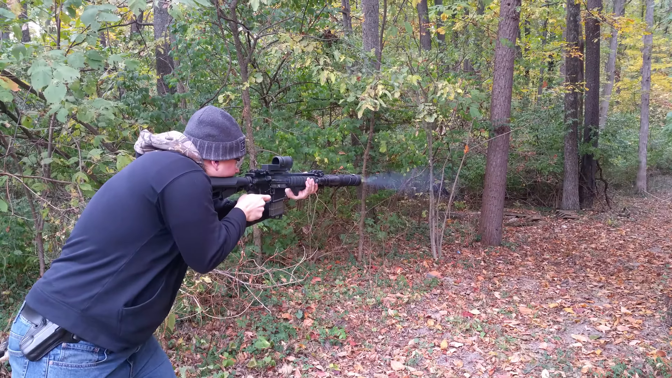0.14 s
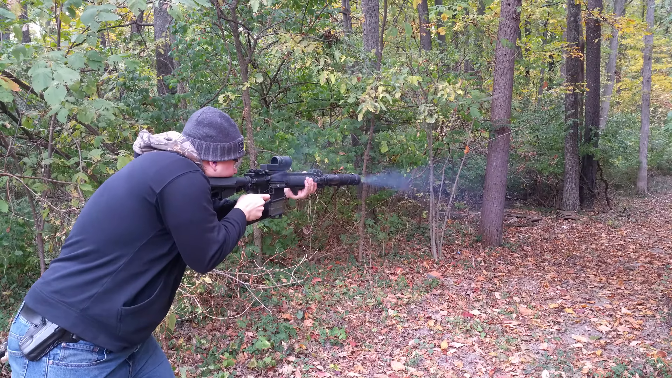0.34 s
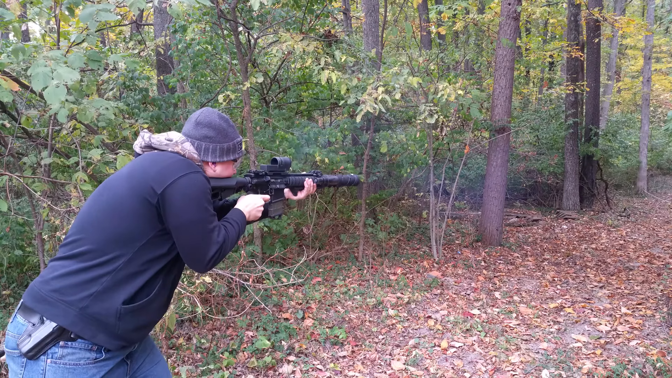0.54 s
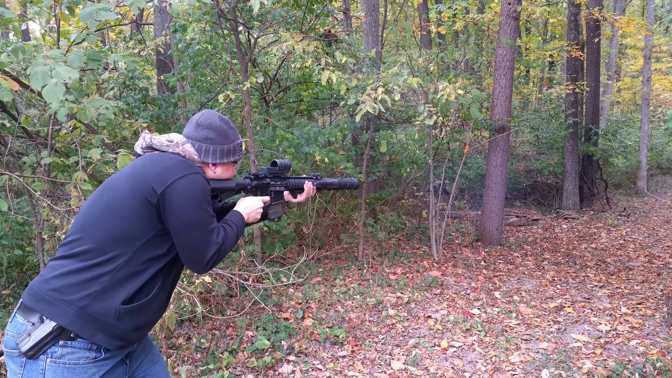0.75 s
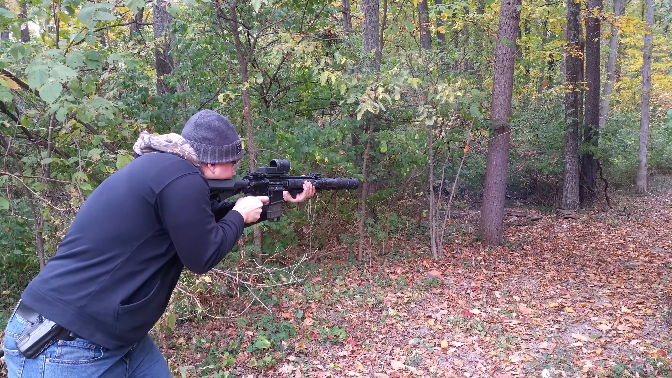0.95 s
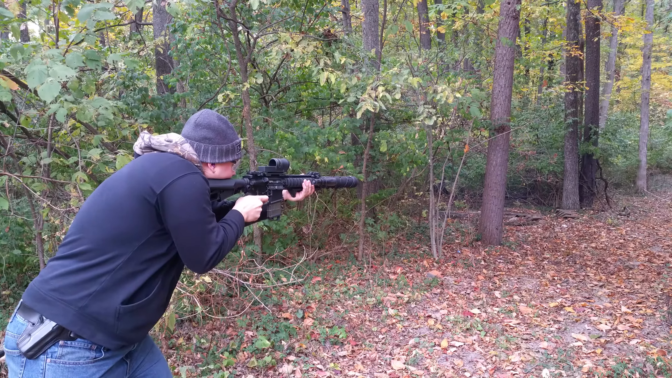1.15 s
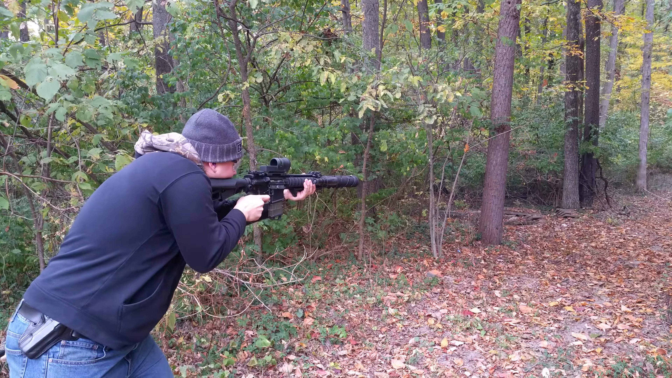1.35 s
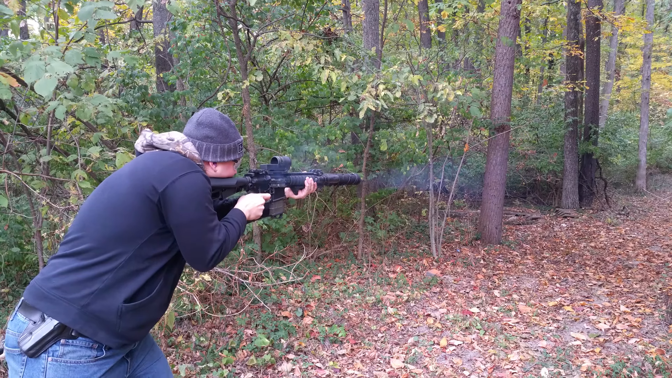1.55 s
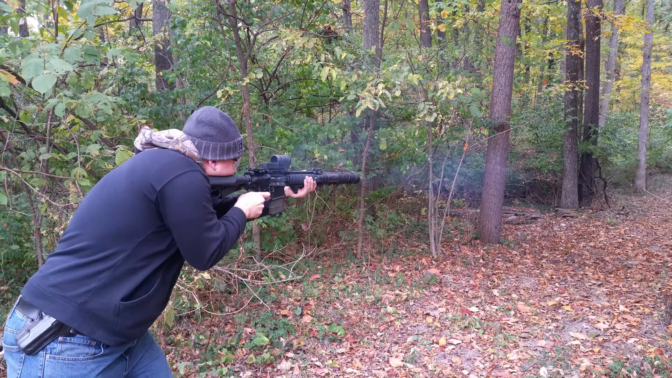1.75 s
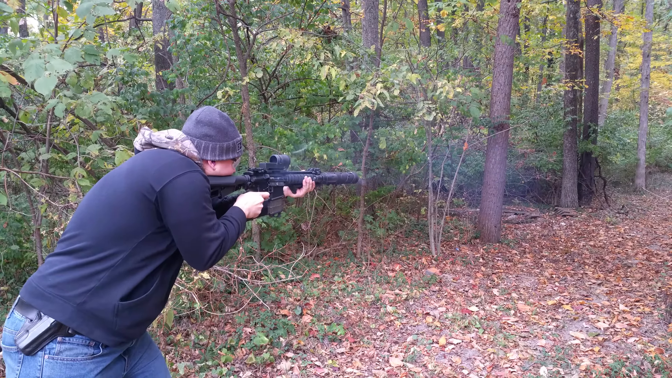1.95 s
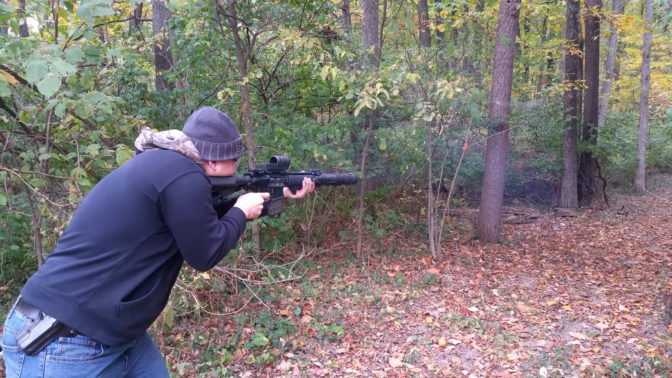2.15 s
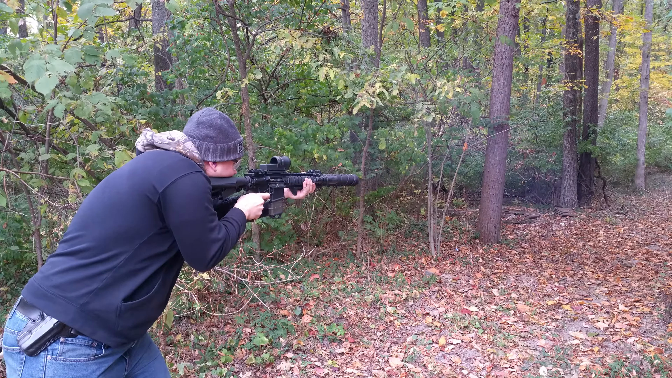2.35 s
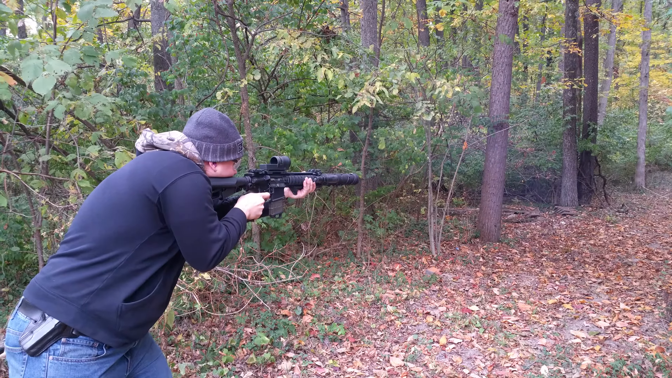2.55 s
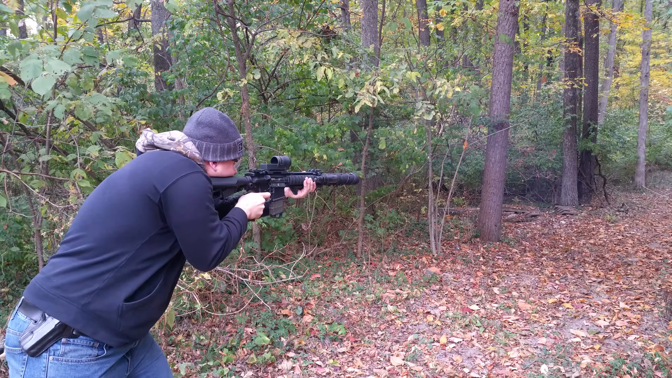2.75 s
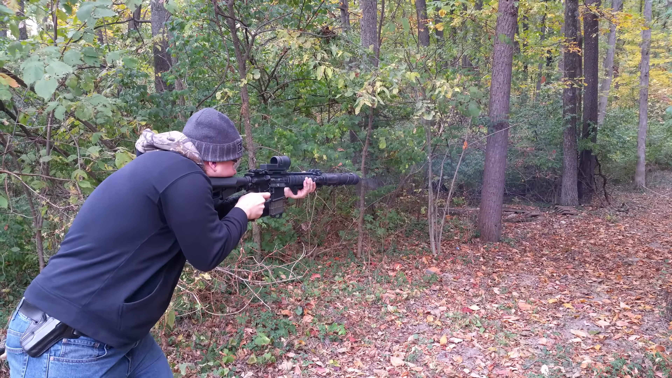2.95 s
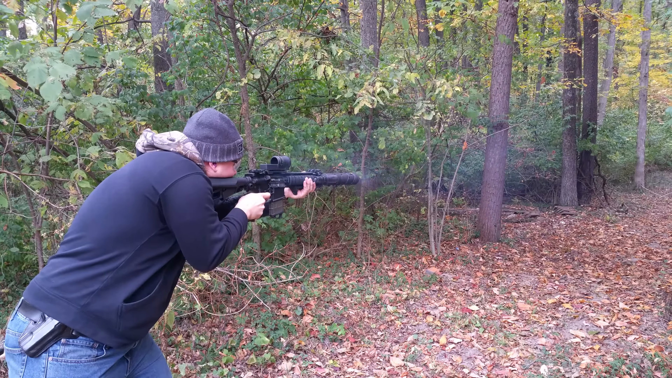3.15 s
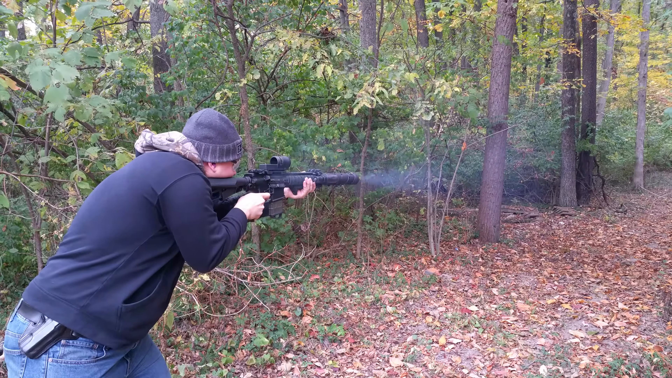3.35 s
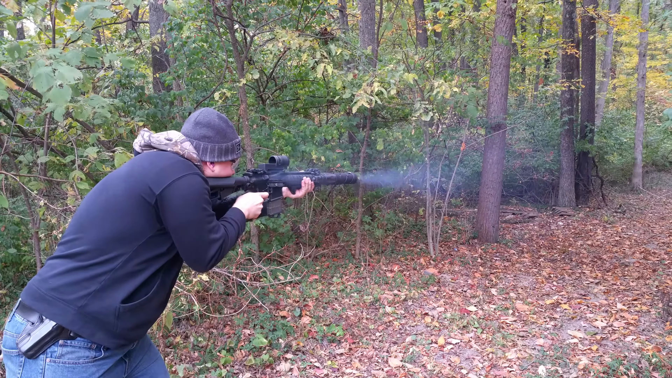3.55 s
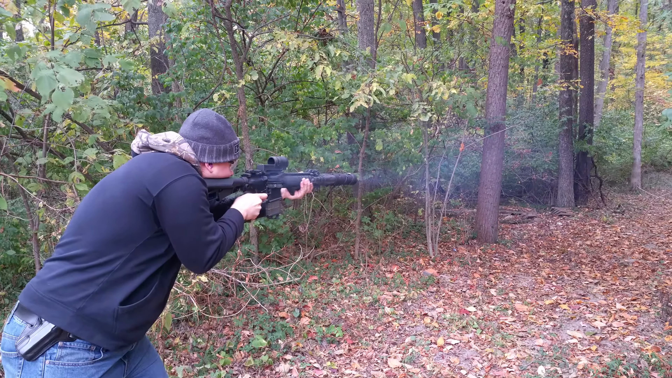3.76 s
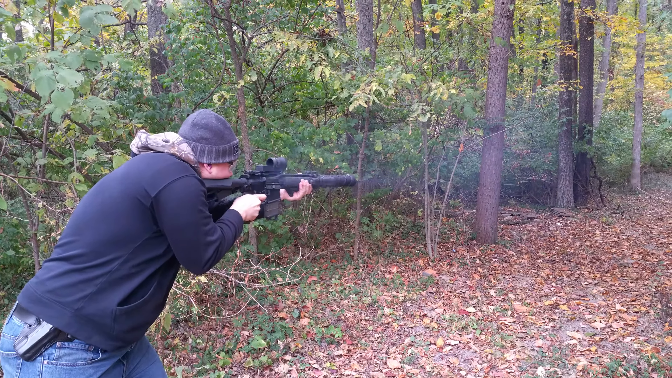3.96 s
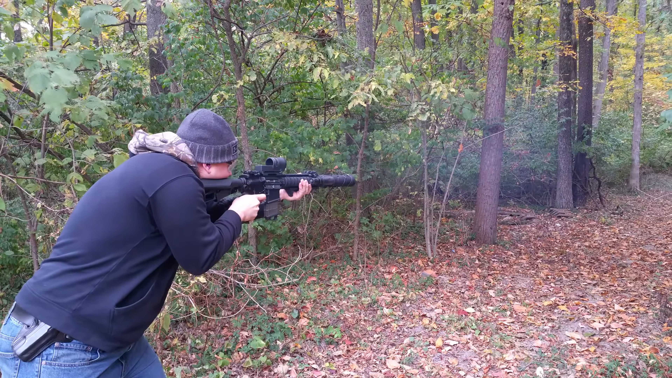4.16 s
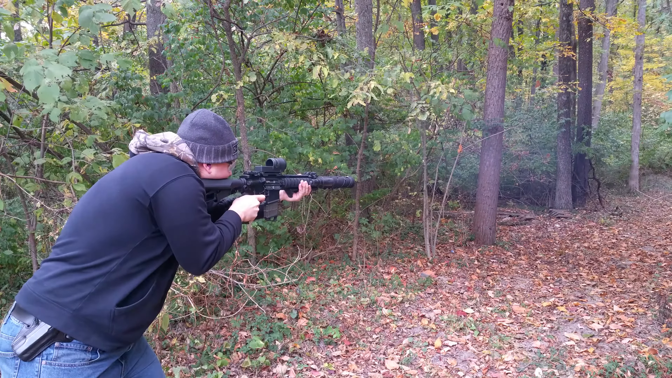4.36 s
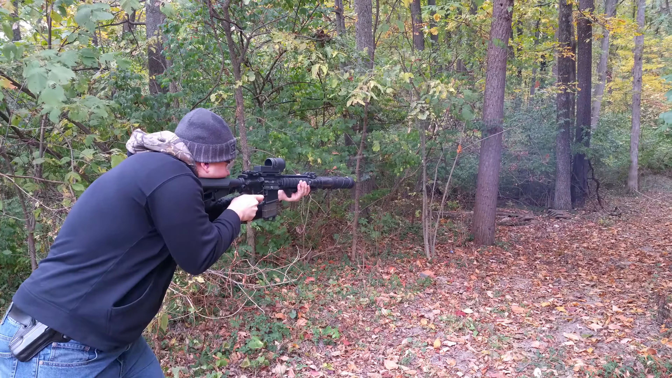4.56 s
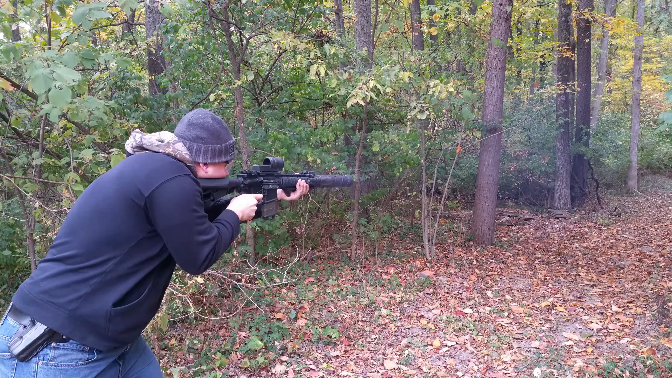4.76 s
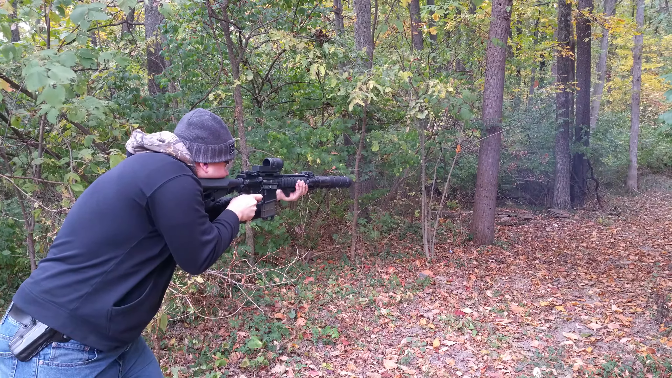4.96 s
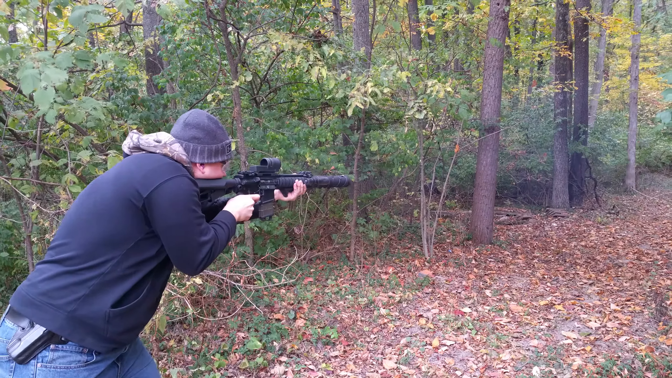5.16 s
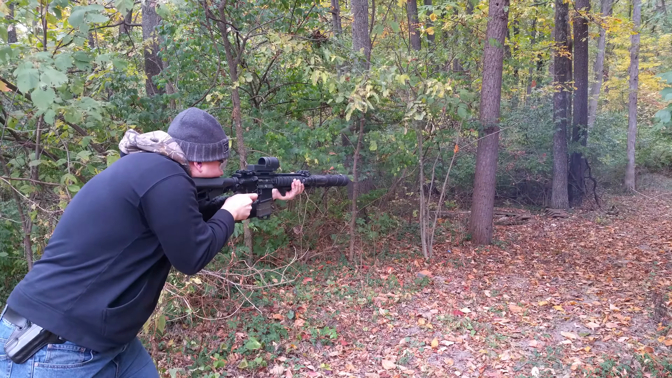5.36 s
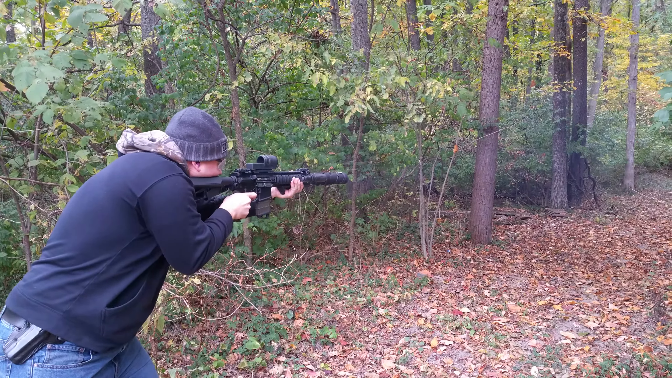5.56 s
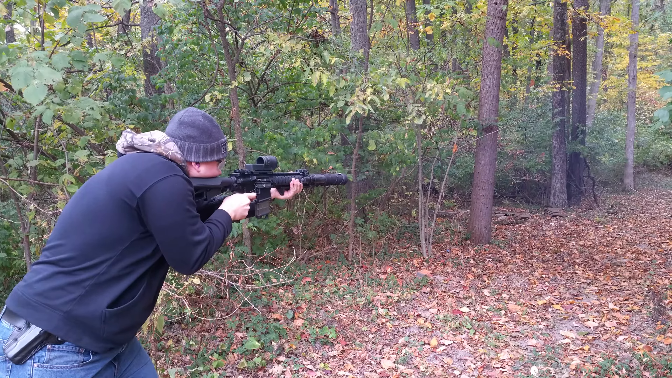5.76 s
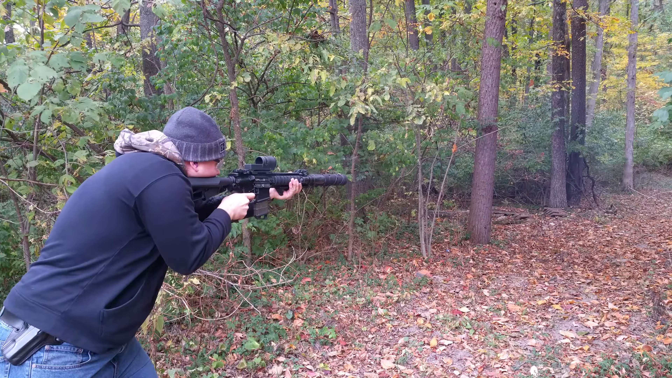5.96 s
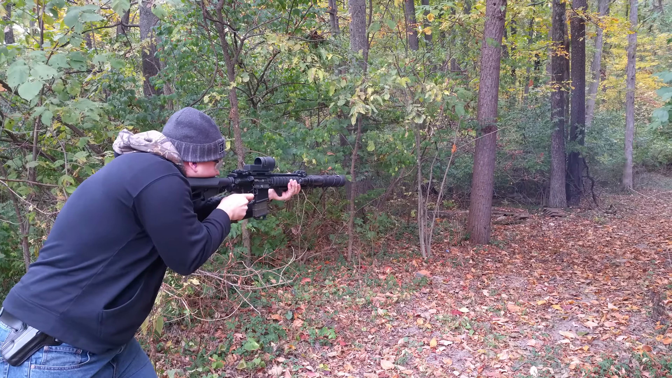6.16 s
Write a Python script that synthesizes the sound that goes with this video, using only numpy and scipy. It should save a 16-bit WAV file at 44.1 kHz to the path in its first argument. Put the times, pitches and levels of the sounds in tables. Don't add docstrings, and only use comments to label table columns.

```python
import sys
import numpy as np
from scipy import signal
from scipy.io import wavfile
from scipy.ndimage import uniform_filter1d

SR = 44100
rng = np.random.default_rng(int(sys.argv[2]) if len(sys.argv) > 2 else 0)


def store_wav(level_fs):
    pcm = np.round(np.clip(np.atleast_2d(level_fs), -1, 1) * 32767)
    wavfile.write(sys.argv[1], SR, pcm.T.astype(np.int16))


def ratio(d):
    e = np.asarray(d, float) / 20
    return 10 ** e


N = 273861


def evened(x):
    return x / np.sqrt(np.mean(x ** 2) + 1e-20)


def read(points, hz, order=1):
    rows = np.transpose(points)
    return np.interp(np.log(hz + 1), np.log(rows[0] + 1), rows[order])[:, None]


def add(mix, s, sound):
    part = mix[:, round(s * SR):][:, :sound.shape[1]]
    part += sound[:, :part.shape[1]]


# (frequency [Hz], correlation [-1 to 1])
PORT_CORRELATION = [(60, 0.52), (180, 1), (550, 0.31), (1650, -0.099), (4970, -0.00087), (15000, 0.27)]


def shaped(seconds, gain, likeness, size=256):
    count, hop = round(seconds * SR), size // 4
    t = np.arange(count // hop + 5) * hop / SR
    hz = np.fft.rfftfreq(size, 1 / SR)
    a, b, c, d = rng.standard_normal((len(t), len(hz), 4)).T
    left, independent = a + 1j * b, c + 1j * d
    same = np.clip(likeness * read(PORT_CORRELATION, hz), -1, 1)
    right = same * left + np.sqrt(1 - same ** 2) * independent
    spectrum = np.array([left, right]) * gain(hz, t)
    return signal.istft(spectrum, nperseg=size, noverlap=size - hop)[1][:, :count] / np.sqrt(size)


# (frequency [Hz], left minus right [dB])
PORT_DIFFERENCE = [(100, 2), (300, 2.5), (700, -1), (1500, -3), (2600, -2.5), (4000, -11), (5400, -12),
                   (5800, -18.5), (6800, -21), (7800, -0.5), (9000, 3), (11500, 13), (15000, 2)]


def ports(hz):
    return ratio(np.array([.5, -.5])[:, None, None] * read(PORT_DIFFERENCE, hz))


def clumps(count, depth_db, size):
    return ratio(depth_db * evened(uniform_filter1d(rng.standard_normal((2, count)), size)))


def rise(count, seconds):
    return 1 - np.exp(-(np.arange(count) / SR / seconds) ** 3)


# (frequency [Hz], level [dB])
AIR_SPECTRUM = [(40, -15), (90, -12), (200, -15), (450, -18.5), (900, -23), (2000, -31.5), (4300, -30),
                (5500, -37), (7500, -52.5), (16000, -55.5)]
# (time [s], level [dB])
AIR_LEVEL = [(0, -50.5), (.24, -51.5), (.3, -43), (1.5, -62.5), (2.8, -77), (6.3, -69)]
# (centre time [s], level [dB], length [s])
WIND_GUSTS = [
    (.015, -38, .09),
    (.148, -49, 0.081),
    (.65, -46, .1),
    (0.868, -45, .055),
    (1.11, -62, .06),
    (2.596, -57, .06),
    (2.685, -65, .04),
]


def air():
    t = np.arange(N) / SR
    colour = lambda hz, t: ratio(read(AIR_SPECTRUM, hz)) * ports(hz) + 0 * t
    hiss = evened(shaped(N / SR, colour, 0.97, size=1024))
    wind_band = signal.butter(2, (35, 130), "band", fs=SR, output="sos")
    wind = evened(signal.sosfilt(wind_band, rng.standard_normal((2, N))))
    still = ratio(np.interp(t, *np.transpose(AIR_LEVEL)))
    gusts = np.zeros(N)
    for s, db, length in WIND_GUSTS:
        gusts += ratio(db) * np.cos(np.pi * np.clip((t - s) / length, -.5, .5)) ** 2
    return still * hiss + (ratio(-8.5) * still + gusts) * wind


def thud(peak_db, hz, cycles):
    turns = np.arange(round(SR * np.clip(cycles, 1.2, 4.5) / hz)) * hz / SR
    lead = rng.uniform(0, 1) + np.array([[0], [rng.uniform(-0.21, .2)]])
    return ratio(peak_db - 2.5) * np.sin(2 * np.pi * (turns + lead)) * np.hanning(len(turns))


def add_thud(mix, s, peak_db, hz, cycles):
    add(mix, max(s - .002, 0), thud(peak_db, hz, cycles))


# (time [s], peak level [dB], frequency [Hz], length [cycles])
LOW_BUMPS = [
    (.001, -30, 94, 1.9),
    (0.018, -33, 97, 3),
    (0.14, -41, 184, 3.1),
    (.86, -43, 90, 2.1),
    (.248, -11, 380, 2.3),
    (.304, -12, 199, 2.5),
    (.474, -12.5, 143.6, 1.6),
    (1.639, -10, 453, 1.6),
]


def bumps(mix):
    for bump in LOW_BUMPS:
        add_thud(mix, *bump)


# (frequency [Hz], level [dB])
SNAP_SPECTRUM = [(1000, -14.5), (2500, -6), (3500, -3.5), (5000, -4.5), (6500, -16.5), (8500, -23.5),
                 (12000, -27), (15000, -22)]


def tick(peak_db, pan_db, t60, bright_db):
    def colour(hz, t):
        treble_db = bright_db / (1 + (9000 / (hz[:, None] + 1)) ** 4)
        return ratio(read(SNAP_SPECTRUM, hz) + treble_db) * ports(hz) + 0 * t
    burst = evened(shaped(.12, colour, .5)[:, 300:])
    t = np.arange(burst.shape[1]) / SR
    fade = (1 - np.exp(-t / 0.00037)) * (1 - t / t[-1])
    pan = ratio(np.array([[.5], [-.5]]) * (pan_db + 7.5))
    return ratio(peak_db - 60 * t / t60) * pan * burst * fade


# (time [s], peak level [dB], decay T60 [s], brightness [dB])
TRIGGER_TICKS = [
    (.0045, -41, 0.022, -16),
    (1.152, -56, .07, 7),
    (1.169, -53, 0.021, 3),
    (1.2394, -37, .03, 10),
    (1.345, -58, .025, -.5),
    (1.557, -47.5, .042, -3),
    (2.76, -44, .053, -4),
    (2.775, -56.5, 0.3, 6),
]


def trigger(mix):
    for s, db, t60, bright_db in TRIGGER_TICKS:
        add(mix, s, tick(db, -9, t60, bright_db))


def hammer(mix, s):
    add(mix, s - .0086, tick(-13.0, -6.5, 0.0062, -4))
    add(mix, s - .005, tick(-28.5, -6.0, 0.066, -13))


# (frequency [Hz], left level [dB], right level [dB], left T60 [s], right T60 [s])
OVERLOAD_HASH = [(40, -16, -22, .3, .9), (120, -4, -5.5, 0.27, 1), (535, 2, 2.5, 0.13, 0.71),
                 (2090, -2, 3.5, 0.4, 0.28), (5030, -6, -5, 0.65, 0.81), (8000, -11, -10, 0.23, 0.37),
                 (10400, -4, -11, 0.24, 0.33), (15500, -6.5, -4, 0.24, 0.32)]


def overload(hash_db, bass_db, length):
    def gain(hz, t):
        level_db = np.array([read(OVERLOAD_HASH, hz, order=k) - 60 * t / read(OVERLOAD_HASH, hz, order=k + 2)
                             for k in (1, 2)])
        low = 1 / (1 + (hz[:, None] / 500) ** 2)
        let_go = 1 / (1 + np.exp((length - t) / .004))
        released_db = (np.array([-2.5, -8])[:, None, None] - 16 * low) * let_go
        lumps_db = 2.9 * evened(uniform_filter1d(rng.standard_normal((2, 1, len(t))), size=6))
        return ratio(level_db + released_db + (bass_db + lumps_db) * low)
    noise = shaped(0.44, gain, 0)
    grain = clumps(noise.shape[1], 2.2, size=60)
    return ratio(-3.0 + hash_db) * noise * rise(noise.shape[1], 0.00088) * grain


# (frequency [Hz], level [dB])
NEAR_LEVEL = [(60, -23), (200, -20), (600, -17), (820, -7), (1050, -13), (1500, -5), (2400, -2),
              (3300, 2.5), (4000, 4.5), (5300, 3.5), (6500, -7.5), (8000, -15), (11000, -22.5),
              (15500, -31)]
# (frequency [Hz], T60 [s])
NEAR_DECAY = [(100, 1.1), (500, 1.44), (1500, 1.5), (4000, 0.91), (6500, 0.58), (9000, 0.57), (15000, 0.41)]
# (frequency [Hz], level [dB])
FAR_LEVEL = [(60, -15.5), (200, -28), (450, -19), (800, -4), (1600, -6), (2600, -11.5), (4200, -13.5),
             (6000, -35.5), (8000, -45), (16000, -67.5)]
# (frequency [Hz], T60 [s])
FAR_DECAY = [(100, 4), (1000, 2.07), (4000, 0.72), (9000, 1.5)]


def woods(s, echo_db):
    def gain(hz, t):
        late = np.sqrt(t ** 2 + 0.079 ** 2) - .05
        near = ratio(-6.5 + read(NEAR_LEVEL, hz) - 60 * late / read(NEAR_DECAY, hz))
        far = ratio(-19.5 + read(FAR_LEVEL, hz) - 60 * t / read(FAR_DECAY, hz))
        since = s + t - np.array(SHOT_STRING)[:, :1]
        sunk_db = -7 * (np.exp(-(since / 0.14) ** 4) * (since >= 0)).max(0)
        lumps_db = 3.6 * evened(uniform_filter1d(rng.standard_normal(len(t)), size=3))
        low = 1 / (1 + (hz[:, None] / 1400) ** 2)
        return np.hypot(near, far) * ports(hz) * ratio(low * (sunk_db + lumps_db))
    tail = shaped(2.1, gain, 1, size=512)
    count = tail.shape[1]
    return ratio(echo_db) * tail * rise(count, 0.0018) * clumps(count, 0.45, size=90)


def n_wave(seconds):
    u = np.arange(600) / SR / seconds
    return (1 - u) * np.exp(-u) * (1 - np.exp(-6 * u))


def blast(peak_db):
    pulse = n_wave(.00009)
    pulse = pulse + 0.58 * np.roll(pulse, round(SR * rng.uniform(.0005, 0.0016)))
    rung = np.array([signal.lfilter(*signal.iirpeak(hz, 1.3, SR), pulse) for hz in (2300, 4300)])
    return ratio(peak_db) * (rung / np.abs(rung).max() + 0.39 * n_wave(0.00041))


def trunks(echo_db, count=45):
    when, size, side, sign = rng.random((count, 4)).T
    when = 0.35 * when ** 1.8
    train = np.zeros((2, SR // 2 + 40))
    level = ratio(echo_db - 20.5 - 60 * when / 0.79 - 4.5 * np.log(size + .05)) * np.sign(sign - .5)
    for port, lag in enumerate((side, 1 - side)):
        np.add.at(train[port], (when * SR + 30 * lag).astype(int), level * (1.3 - lag))
    dull_pulse = np.convolve(n_wave(.00016), np.hanning(12) / 5.5)
    return signal.oaconvolve(train, dull_pulse[None])


# (delay [s], peak level [dB], frequency [Hz], length [cycles])
HOLLOW_RETURNS = [
    (.056, -18.5, 600, 2.2),
    (.084, -44, 780, 2.1),
    (.114, -30.5, 760, 2.2),
    (.14, -34, 870, 2.5),
    (.168, -22.5, 830, 2.3),
    (.217, -25, 742, 2.1),
]


def knocks(mix, s, bass_db, length):
    add_thud(mix, s + length - .004, -28.5 + bass_db, 140, 2.1)
    for delay, db, hz, cycles in HOLLOW_RETURNS:
        a, b, c = rng.uniform(-.5, 0.493, 3)
        add_thud(mix, s + delay + 0.00806 * a, db + 11 * b, hz * (1 + 0.16 * c), cycles)


def bolt(mix, s):
    late, loud = rng.uniform(-0.56, 0.61, 2)
    add(mix, s + 0.057 + 0.018 * late, tick(-13 + 10.5 * loud, -8.5, .005, 8))


def slap(mix, s, slap_db):
    add(mix, s + .1135 - .00045 * s, tick(slap_db + 5, -14, .006, 3 + 1.8 * s))


# (time [s], strength [dB], trunk slap [dB], extra bass [dB], overload length [s])
SHOT_STRING = [(.249, 3.5, -10, 7, .073), (0.439, 0.8, -27, 10, .066), (1.5934, 2, -24, 7.5, 0.073),
               (1.7835, 1.5, -20, -2, 0.076), (1.9663, 2, -24, 0.5, 0.074), (2.8759, 2, -20, 1.5, 0.077),
               (3.0757, 1.5, -24, -1.5, 0.084), (3.2753, 1.6, -26, 0, 0.074), (3.4576, 2, -18, 0, 0.065),
               (3.6491, 1.5, -16, 0, 0.069), (3.85, 2.5, -25, -2, 0.067), (4.0449, 2.5, -19, 1.5, 0.07),
               (4.5483, 2, -18, -0.5, 0.076), (4.7688, 3, -27, 0, 0.069), (5.1269, 2, -25, 0, 0.069),
               (5.326, 3, -25, -1, 0.082), (5.5396, 2.6, -20, 0, 0.073), (5.9468, 2, -21, 0.5, 0.072),
               (6.1594, 2, -18, -2.5, 0.1)]


def shots(mix):
    gaps = np.diff(np.array(SHOT_STRING)[:, 0], prepend=-1)
    for gap, (s, strength_db, slap_db, bass_db, length) in zip(gaps, SHOT_STRING):
        echo_db = 2.5 + 0.34 * strength_db
        hammer(mix, s)
        add(mix, s - .0008, overload(strength_db, bass_db, length))
        add(mix, s - .0008, woods(s, echo_db))
        add(mix, s + .0006, blast(5 - 4.5 * np.exp(-(gap / .3) ** 4)))
        add(mix, s + .004, trunks(echo_db))
        knocks(mix, s, bass_db, length)
        bolt(mix, s)
        slap(mix, s, slap_db)


# (time [s], peak level [dB], decay T60 [s])
CASE_CLINKS = [
    (.722, -46, .04),
    (.843, -63, .04),
    (1.880, -31, .015),
    (2.143, -45, .02),
    (2.252, -52.5, .04),
    (2.298, -47, .055),
    (3.049, -37, .014),
    (3.68, -33, .023),
    (3.725, -36, .02),
    (4.33, -50, .04),
]


def cases(mix):
    for s, db, t60 in CASE_CLINKS:
        add(mix, s, tick(db, -10 + 1.5 * (db + 51), t60, 7))


# (time [s], peak level [dB], decay T60 [s])
SOFT_RUSTLES = [
    (2.510, -52, 0.071),
    (2.519, -51, .11),
    (2.528, -56, .2),
    (4.395, -51, .09),
    (4.415, -48, .078),
    (1.246, -56, .2),
]


def leaves(mix):
    for s, db, t60 in SOFT_RUSTLES:
        add(mix, s, tick(db, -7, t60, 7))


def scene():
    mix = air()
    bumps(mix)
    trigger(mix)
    shots(mix)
    cases(mix)
    leaves(mix)
    return mix


def roll_off(x):
    return signal.sosfilt(signal.butter(12, 16820, fs=SR, output="sos"), x)


def record(dry):
    ahead = np.array(SHOT_STRING)[:, :1] - np.arange(0, N, 32) / SR
    dip_db = -6 * (np.clip((.034 - ahead) / .03, 0, 1) ** 2 * (ahead > 0)).sum(0)
    ducked = dry * ratio(np.interp(np.arange(N) / 32, np.arange(len(dip_db)), dip_db))
    rounded = ducked / (1 + np.abs(ducked / 0.88) ** 4) ** (1 / 4)
    cut = signal.sosfilt(signal.butter(2, 59, "high", fs=SR, output="sos"), rounded)
    low_pass = signal.firwin(255, 15800, window=("kaiser", 9), fs=SR)
    limited = signal.oaconvolve(cut, low_pass[None], "same")
    return roll_off(np.clip(limited, -1, 1))


dry = scene()
out = record(dry)
store_wav(out)
```